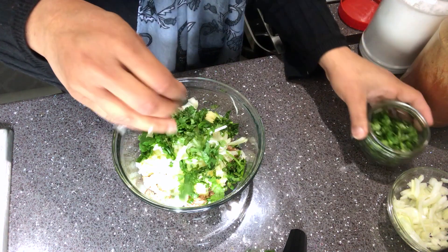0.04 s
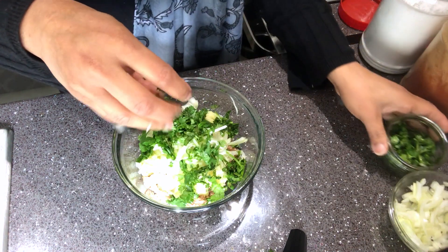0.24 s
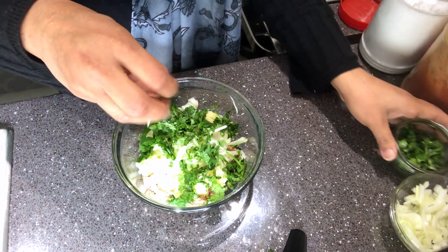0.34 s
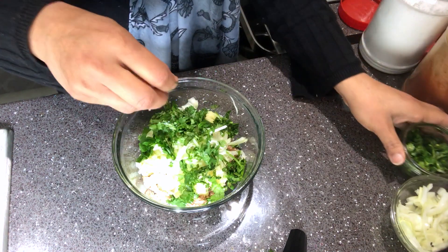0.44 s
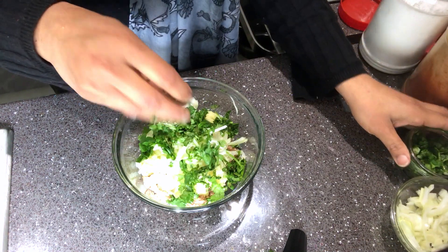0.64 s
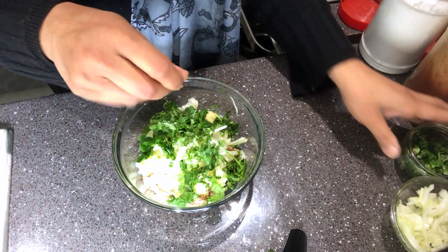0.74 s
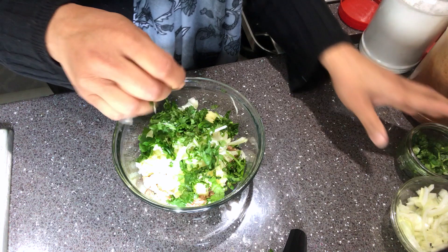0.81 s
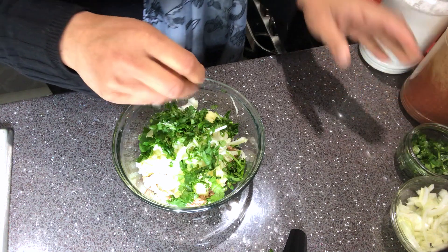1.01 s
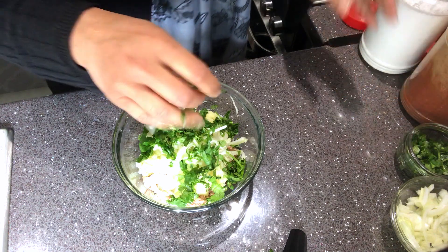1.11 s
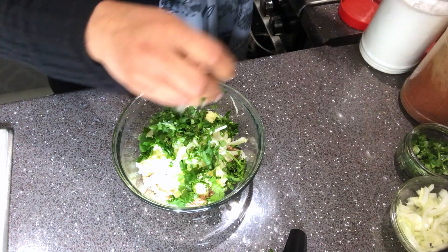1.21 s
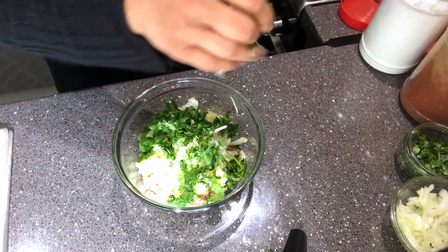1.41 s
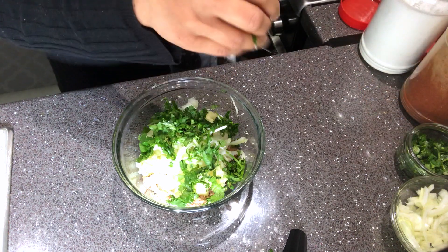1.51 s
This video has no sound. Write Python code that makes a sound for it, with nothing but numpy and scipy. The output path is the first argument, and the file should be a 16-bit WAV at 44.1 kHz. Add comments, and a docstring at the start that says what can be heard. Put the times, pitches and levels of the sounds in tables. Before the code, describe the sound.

A small glass bowl clinks sharply against a larger glass bowl, then knocks onto stone counter

```python
"""A small glass bowl of chopped herbs clinks against a larger one, then is set down on a stone counter.
Each rim contact is a burst of cracking noise plus the decaying modes of both bowls.
The base knocks, rocks and settles: modes of counter and glass, with noise for thuds and thin grazes.
Fingers make faint wet ticks of band-passed noise; a deep swell sounds under the counter.
A small hard kitchen reverberates over soft room noise and a low appliance hum of two wavering tones."""
import sys
import numpy as np
from scipy import signal
from scipy.fft import rfft, irfft
from scipy.io import wavfile
from scipy.ndimage import uniform_filter1d

SR = 44100
rng = np.random.default_rng(int(sys.argv[2]) if len(sys.argv) > 2 else 0)


def generate_wav(signal):
    """Clip the signal to [-1, 1] and save it as 16-bit WAV at the path in sys.argv[1]."""
    frames = np.transpose(np.atleast_2d(signal))
    scaled = np.clip(frames, -1, 1) * 32767
    pcm = np.round(scaled).astype(np.int16)
    wavfile.write(sys.argv[1], SR, pcm)


N = 68355
RESPONSE = 24576  # samples in each ringing and in the room response
RING_ROOM_DB = -9.5  # room sound behind every ringing body


def undb(db):
    """Amplitude factor of a level in dB."""
    return 10 ** (np.asarray(db) / 20)


def on_log_axis(points, f):
    """Join (Hz, value) points by straight lines over log frequency."""
    hz, value = np.array(points, float).T
    return np.interp(np.log(f + 1), np.log(hz), value)


def convolve(x, response):
    """Pass a sound through an impulse response, cut to the scene's length."""
    return signal.fftconvolve(x, response)[:N]


def colour(x, points):
    """Causal minimum-phase filter with the given (Hz, dB) gains."""
    size = 2048
    gain = undb(on_log_axis(points, np.fft.rfftfreq(size, 1 / SR)))
    cepstrum = irfft(np.log(gain))
    # fold the cepstrum onto positive times, so that nothing sounds early
    cepstrum[1:size // 2] *= 2
    cepstrum[size // 2 + 1:] = 0
    return convolve(x, irfft(np.exp(rfft(cepstrum))))


def fade(t60):
    """Exponential decay, 60 dB down after t60 seconds (1 ms at least)."""
    return np.exp(-np.log(1000) * np.arange(RESPONSE) / SR / max(t60, 1e-3))


def delay(x, start):
    """Place a sound at its start time in seconds."""
    lead = np.zeros(max(int(start * SR), 0))
    return np.concatenate([lead, x, np.zeros(N)])[:N]


def burst(t60, size=4096):
    """Dying noise of unit energy, evened out so that no pitch stands out."""
    shape = fade(t60)[:size]
    x = rng.standard_normal(size) * shape
    for _ in range(2):
        spectrum = rfft(x)
        flat = irfft(spectrum / (abs(spectrum) + 1e-12))
        x = flat * np.minimum(1, 10 * shape)
    return x / np.sqrt(np.sum(x ** 2))


def ring(modes, start=0):
    """Decaying partials of a struck body; given its start, a strike adds in step to what already rings."""
    t = start + np.arange(RESPONSE) / SR
    out = 0
    for k, (hz, db, t60) in enumerate(zip(*modes)):
        sign = (-1) ** k  # neighbouring modes start in opposite directions
        out = out + sign * undb(db) * fade(t60) * np.sin(2 * np.pi * hz * t)
    return out


def soften(x, hz):
    """A softer contact passes less treble: low-pass at the contact cut-off."""
    sos = signal.butter(2, min(hz, SR / 2 - 500), fs=SR, output="sos")
    return signal.sosfilt(sos, x)


def kitchen():
    """Diffuse room response of about unit energy: noise bands that die at their own rates, treble soonest."""
    # Reverberation of the small hard room. Each row: band centre in Hz, t60 in seconds.
    room_t60 = [(150, 0.31), (500, 0.41), (1400, 0.44), (4000, 0.36), (7000, 0.28), (14000, 0.23)]
    gap_s, build_s = .003, 0.0028  # wait before the first reflections, time constant of their build-up
    f, t = np.fft.rfftfreq(RESPONSE, 1 / SR), np.arange(RESPONSE) / SR
    noise, out = rfft(rng.standard_normal(RESPONSE)), 0
    for k, (hz, t60) in enumerate(room_t60):
        share = on_log_axis([(row[0], j == k) for j, row in enumerate(room_t60)], f)
        unit_energy = np.sqrt(2 * np.log(1000) / (t60 * SR))
        out = out + irfft(noise * share) * fade(t60) * unit_energy
    return delay(out * (1 - np.exp(-t / build_s)), gap_s)[:RESPONSE]


def in_room(x, room, db):
    """Direct sound plus its reverberation at a level in dB."""
    return x + undb(db) * convolve(x, room)


def hum(hz):
    """A slightly wandering tone of unit rms."""
    wander_hz = 1.54  # rms drift of the pitch
    wander = signal.resample(rng.standard_normal(size=24), N)
    phase = 2 * np.pi * np.cumsum(hz + wander_hz * wander) / SR
    return np.sqrt(2) * np.sin(phase)


def background():
    """Two wavering low hums under soft room noise."""
    # Colour of the still room's air. Each row: frequency in Hz, filter gain on white noise in dB.
    air = [(20, -58), (35, -60), (55, -39), (80, -36), (120, -37), (250, -42.5), (500, -47.5), (1000, -50),
           (2000, -56), (5000, -60.5), (10000, -67), (15500, -65.5)]
    # Course of the higher hum. Each row: time in seconds, level in dB.
    drone_level = [(0, -58), (0.152, -62.5), (.25, -67.5), (1.242, -64.5), (1.32, -57.5), (1.55, -65)]
    hum_hz, hum_db, drone_hz = 48.8, -57.5, 112.7
    drone_db = np.interp(np.arange(N) / SR, *np.array(drone_level).T)
    room_noise = colour(rng.standard_normal(N), air)
    return room_noise + undb(hum_db) * hum(hum_hz) + undb(drone_db) * hum(drone_hz)


def cupboard():
    """A short deep swell under the counter: a low sine that rises and falls."""
    start_s, length_s = .56, .075
    boom_hz, boom_db = 61, -42.5
    t = np.arange(int(length_s * SR)) / SR
    swell = np.hanning(len(t)) * np.sin(2 * np.pi * boom_hz * t)
    return undb(boom_db) * delay(swell, start_s)


def fingers():
    """Soft wet ticks of fingertips parting: dying noise in a narrow band."""
    # Fingers rubbing off wet herbs.
    # Each row: start in seconds, level in dB relative to tick_db, band centre in Hz, t60 in seconds.
    ticks = [(0.036, -18, 6440, 0.048), (0.098, -21, 5800, 0.035), (1.2696, -4.5, 6040, 0.043),
             (1.286, -8, 7040, 0.17), (1.3062, -15, 4500, 0.066), (1.314, -5, 2610, .06)]
    tick_db, width_octaves = -8, 0.37
    out = 0
    for start, db, hz, t60 in ticks:
        edges = hz * 2 ** (width_octaves * np.array([-.5, .5]))
        edges = np.minimum(edges, SR / 2 - 500)
        band = signal.butter(1, edges, "band", fs=SR, output="sos")
        tick = signal.sosfilt(band, burst(t60))
        out = out + undb(db + tick_db) * delay(tick, start)
    return out


def grazes():
    """Thin clicks where the glass edge catches the stone: very short coloured noise."""
    # Light grazes of the base. Each row: start in seconds, level in dB before the colouring.
    touches = [(0.5476, 3), (0.566, 6.5), (0.677, -14), (0.899, -20.5)]
    # Tone of glass edge on stone. Each row: frequency in Hz, gain in dB.
    graze_colour = [(200, -19), (1500, 0), (4500, -25.5), (6300, -1.5), (8000, -16), (10000, -21.5),
                    (16000, -29)]
    graze_t60_s = .012
    clicks = sum(undb(db) * delay(burst(graze_t60_s), start) for start, db in touches)
    return colour(clicks, graze_colour)


def knocks(room):
    """The base thuds on the counter, rocks and comes to rest; each knock rings stone and glass."""
    # Base on the counter.
    # Each row: start in seconds, relative level in dB, contact cut-off in Hz, ring of the glass in dB.
    contacts = [(0.3076, 6.5, 2020, 1), (.3355, -7, 960, -8), (.456, -17.5, 2600, -12),
                (.5515, 9.5, 2850, -7), (0.5655, 6, 2730, 6), (0.6806, -15, 1900, -14),
                (0.6842, -1.5, 1010, 14), (.7105, -7.5, 485, -20)]
    # Counter with the loaded bowl on it, one column per mode.
    # The three rows: frequency in Hz, level in dB, t60 in seconds.
    counter_modes = [
        [165, 236, 318, 514, 552, 630, 781, 1068, 1222, 1308, 1370, 1432, 1520, 1680, 1831],
        [-46, -48, -39.5, -36.5, -34, -45.5, -39, -34, -36.5, -37.5, -33, -38.5, -45, -35.5, -38],
        [-0.04, 1, 0.2642, 0.1073, 0.23, 0.22, 0.14, 0.1, 0.16, 0.06, 0.1631, 0.2352, 0.15, .11, 0.14],
    ]
    # Glass struck from below, one column per mode. The three rows: frequency in Hz, level in dB, t60 in seconds.
    base_modes = [
        [2605, 2655],
        [-37, -33],
        [0.1144, 0.11],
    ]
    # Dense short resonances of the knock. Each row: frequency in Hz, gain in dB.
    knock_thud = [(50, -18), (110, -2.5), (220, 10.5), (370, 5), (520, 16), (750, 6.5), (1300, 13),
                  (1800, 10), (2100, 3), (3200, -1.5), (6500, -7.5), (12000, -2.5)]
    thud_t60_s, thud_room_db = 0.027, -2
    counter, base = ring(counter_modes), ring(base_modes)
    rings, thuds = 0, 0
    for start, db, hz, glass_db in contacts:
        body = counter + undb(glass_db) * base
        rings = rings + undb(db) * delay(soften(body, hz), start)
        thuds = thuds + undb(db) * delay(soften(burst(thud_t60_s), hz), start)
    thuds = colour(thuds, knock_thud)
    return in_room(rings, room, RING_ROOM_DB) + in_room(thuds, room, thud_room_db)


def clinks(room):
    """Each touch of the rims cracks and sets both bowls ringing, damped by hand and contact."""
    # Rim against rim. Each row: start in seconds, relative level in dB, contact cut-off in Hz,
    # crack in dB, ring of the larger bowl in dB, t60 in seconds of the extra damping by hand and contact.
    touches = [(.2096, 5.5, 15500, -0.5, -1, 5), (0.2154, 6.5, 13500, -1, 0.5, 5),
               (0.2186, 6, 6960, 3.5, -1.5, 4.4), (.3135, 1, 6900, -6, -11, .7),
               (.4525, -11, 10800, -11.5, -22, 0.12), (0.5791, 1.5, 8700, -23, -26, 0.13),
               (0.801, -28.5, 8250, -3.5, -12, 0.11)]
    # Ringing of the small bowl, one column per mode.
    # The three rows: frequency in Hz, level in dB, t60 in seconds before the extra damping.
    small_bowl = [
        [2664, 3741, 3798, 3897, 3932, 4100, 6695, 6757, 6942, 7168, 11900, 12060, 12570, 14630],
        [-40, -46, -46, -35.5, -38.5, -45.5, -42, -39, -38.5, -48, -37, -44, -52, -37.5],
        [0.25, 0.14, 0.29, 0.296, 0.1943, 0.07, 0.18, 0.2, 0.3143, 0.14, 0.03, 0.02, 0.1, 0.18],
    ]
    # Ringing of the larger bowl, laid out in the same way.
    large_bowl = [
        [630, 1383, 1590, 2225, 2876, 2937, 4190, 4285, 5491, 5809, 6078, 10538],
        [-43.5, -39, -36, -43.5, -64, -47, -44.5, -38, -60.5, -48, -46, -32.5],
        [0.23, -0.01, 0.2348, 0.15, 0.06, 0.05, 0.15, 0.12, -0.05, 0.17, -0.18, 0.1],
    ]
    # Dense short resonances of the rim contact. Each row: frequency in Hz, gain in dB.
    clink_crack = [(80, -18), (200, -2), (400, -4.5), (600, 2), (900, -5), (1400, 3.5), (2800, 5.5),
                   (3300, -1), (4000, 13), (4800, -3), (6000, 1), (7000, 10.5), (8200, -7), (9700, -15.5),
                   (12000, -2), (13500, -11), (16000, -16)]
    crack_t60_s, crack_room_db = 0.061, -1.5
    rings, cracks = 0, 0
    for start, db, hz, crack_db, large_db, damping_t60 in touches:
        glass = ring(small_bowl, start) + undb(large_db) * ring(large_bowl, start)
        damped = glass * fade(damping_t60)
        rings = rings + undb(db) * delay(soften(damped, hz), start)
        crack = soften(burst(crack_t60_s), hz)
        cracks = cracks + undb(db + crack_db) * delay(crack, start)
    cracks = colour(cracks, clink_crack)
    return in_room(rings, room, RING_ROOM_DB) + in_room(cracks, room, crack_room_db)


def scene():
    """Bowls, counter and fingers share one kitchen; the swell and the background stay dry."""
    room = kitchen()
    small_sounds = in_room(grazes() + fingers(), room, -8.5)  # room level in dB
    return (clinks(room) + knocks(room) + cupboard() + small_sounds + background())[None]


def record(dry):
    """The microphone's gain control ducks when the sound gets loud and recovers slowly; the top is cut."""
    ceiling_db, window_s = -21, .004
    release_s = 1.5  # time constant of the recovery
    top_hz = 16000
    power = uniform_filter1d(dry[0] ** 2, max(int(window_s * SR), 1))
    loudness = np.sqrt(abs(power))
    release = np.exp(-np.arange(N) / SR / release_s)
    held = np.maximum.accumulate(loudness / release) * release  # peaks held, then sinking
    gain = 1 / np.maximum(1, held / undb(ceiling_db))
    top_cut = signal.ellip(8, .2, 70, top_hz, fs=SR, output="sos")
    return signal.sosfilt(top_cut, dry * gain)


dry = scene()
out = record(dry)
generate_wav(out)
```